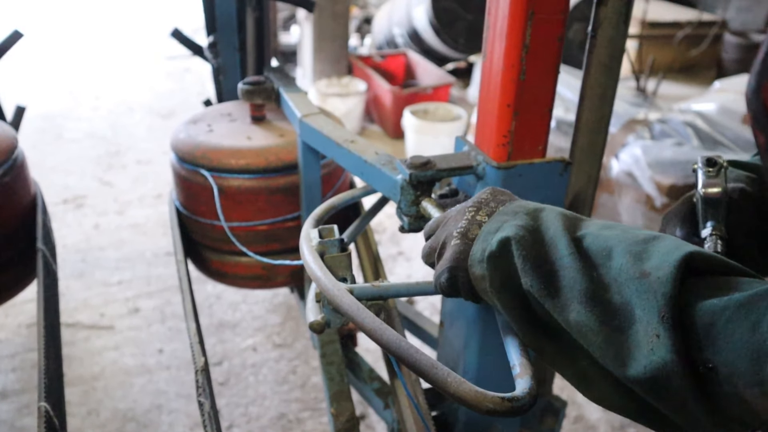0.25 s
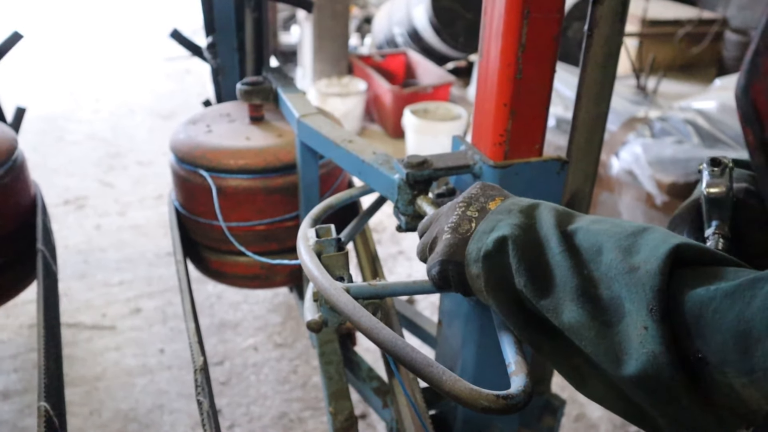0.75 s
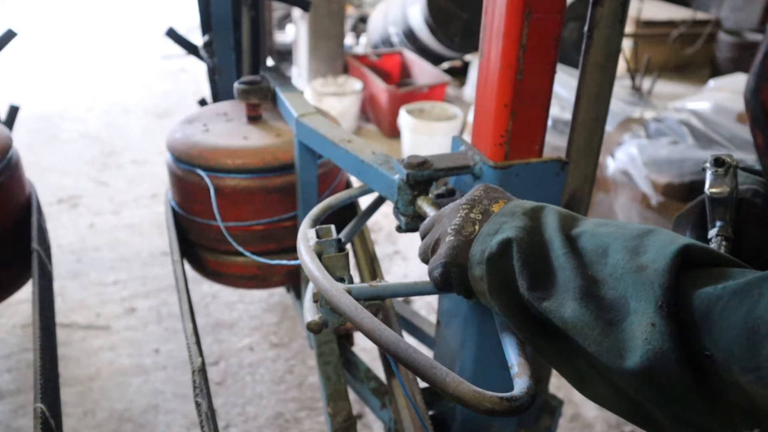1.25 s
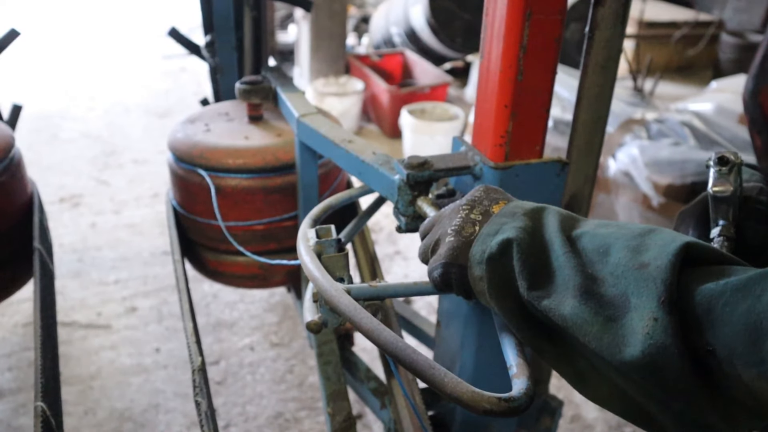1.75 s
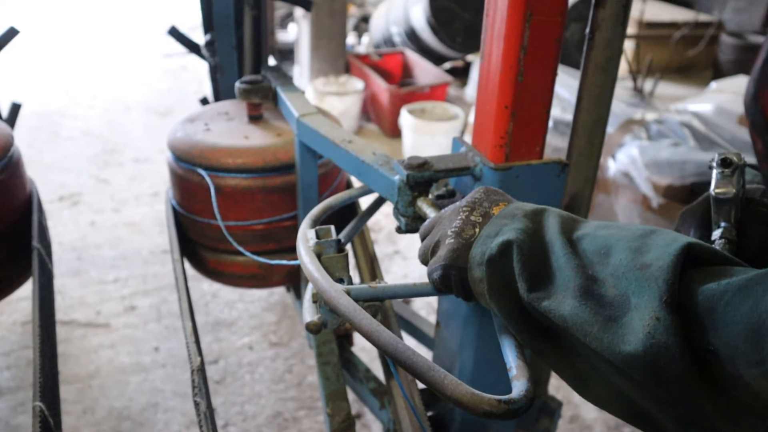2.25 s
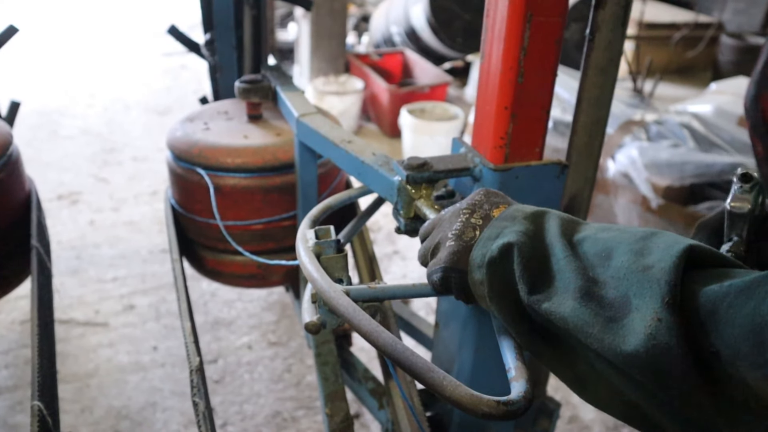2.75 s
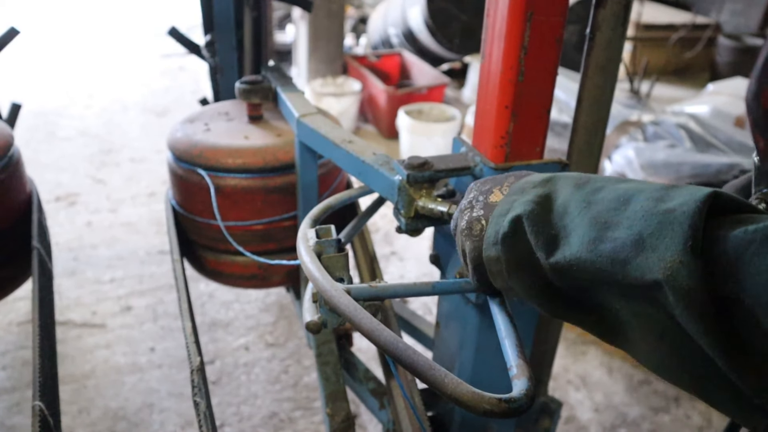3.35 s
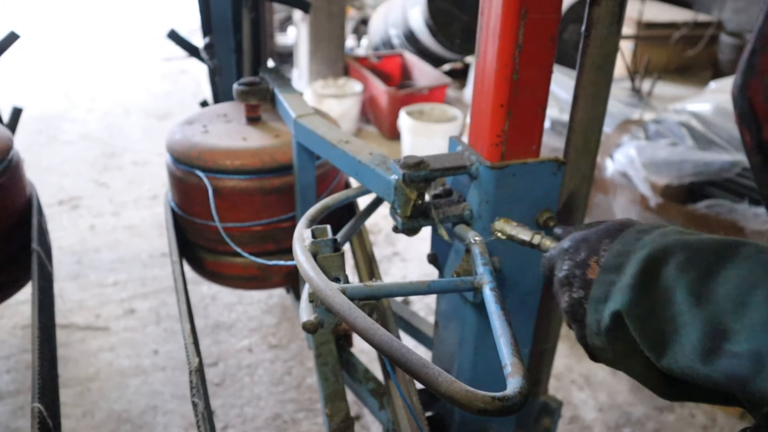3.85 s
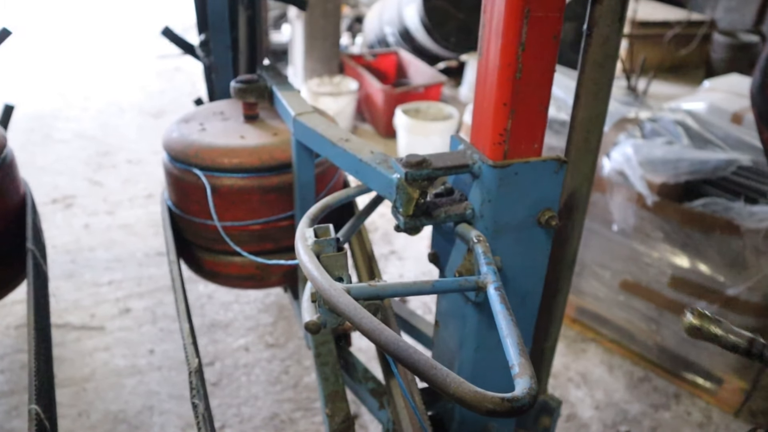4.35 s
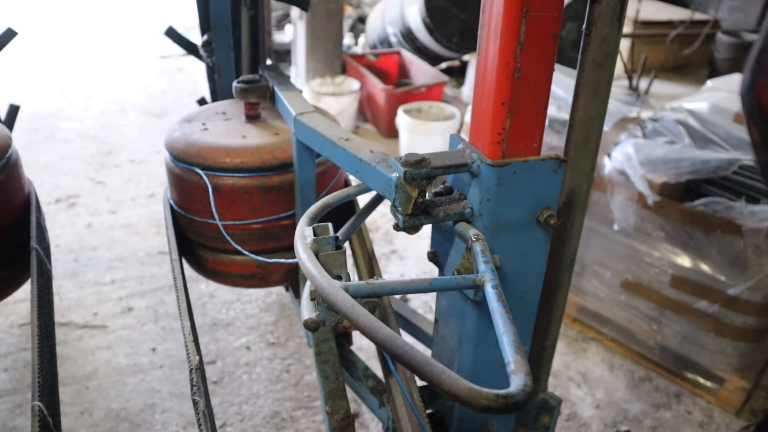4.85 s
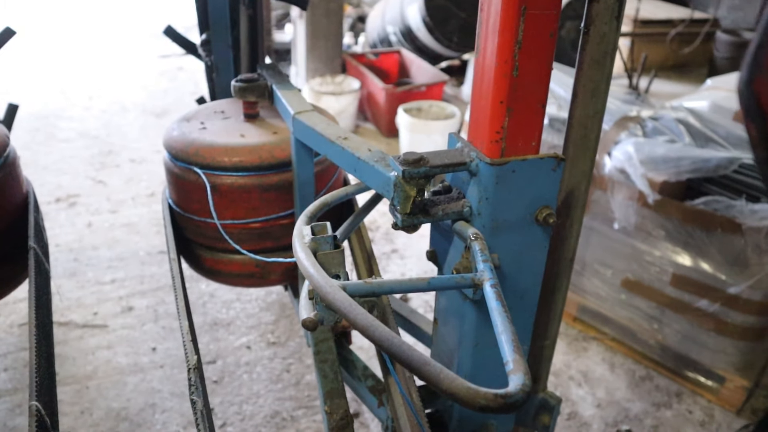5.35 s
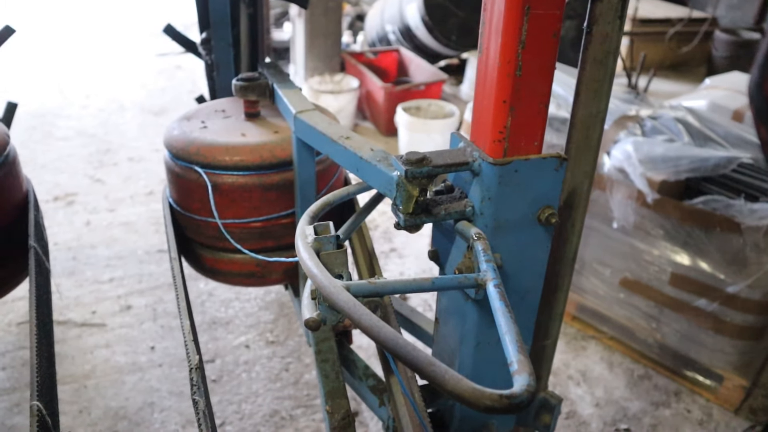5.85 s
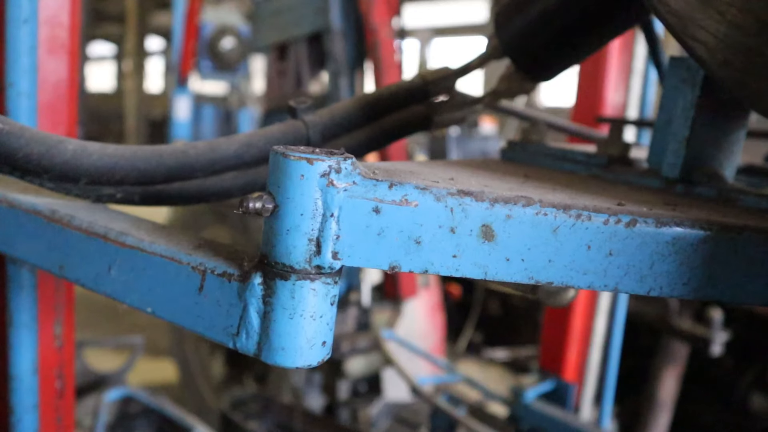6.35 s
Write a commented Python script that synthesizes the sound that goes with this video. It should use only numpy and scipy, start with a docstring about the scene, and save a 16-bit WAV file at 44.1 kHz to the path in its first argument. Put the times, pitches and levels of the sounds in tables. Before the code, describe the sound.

Close up in a quiet shed, a gloved hand and stiff sleeve crackle with tiny dry ticks and soft gun bumps. A brief steel lever scrape leads to two very loud pops close together, then a third with a metallic clack, and a fourth after a pause. Each cracks with hissing air that dies in the shed. The close microphone overloads; the right channel is covered, dull and bassy.

```python
"""Grease gun in a quiet shed

Two microphones in a shed, the right one covered: a grease gun pops four times, each pop a ringing barrel
with a crack and a rush of shaped noise that dies with the shed. Glove and sleeve crackle as short grains,
the lever scrapes as grains over noise, and small knocks are bursts of noise through resonances.
Behind them lies a distant outdoor wash of patchy noise with a soft band and a low rumble."""
import sys
import numpy as np
from scipy import signal
from scipy.fft import rfft, irfft
from scipy.io import wavfile
from scipy.ndimage import uniform_filter1d

SR = 44100
rng = np.random.default_rng(int(sys.argv[2]) if len(sys.argv) > 2 else 0)


def unload_audio(sound):
    """Save the sound as a 16-bit wav file, at the path given as the first command line argument."""
    columns = np.transpose(np.atleast_2d(sound))
    # keep every value between -1 and 1, then stretch to whole-number steps
    steps = np.round(np.clip(columns, -1, 1) * 32767)
    wavfile.write(sys.argv[1], SR, steps.astype(np.int16))


N = 290619
TIME = np.arange(N) / SR
BINS = np.fft.rfftfreq(N, 1 / SR)

# valve slams: (time [s], peak level before the bass cut [dB], barrel tuning factor, tilt [dB per octave],
# crack level [dB], crack frequency [Hz])
POPS = [(2.701, 4, 1.02, 7, -9.5, 6000), (2.9389, 3, 1.08, 6, -10.5, 5660),
        (3.685, 3.5, 1.02, 4, -12, 6540), (4.6314, 4, 1.1, 8.5, -8, 5200)]
# modes of the barrel: (frequency before tuning [Hz], level before tilt [dB], t60 [s])
BARREL_MODES = [(353, 15.5, 0.05), (545, 20.5, 0.015), (667, 6.5, 0.043), (1020, 4.5, 0.012),
                (1335, -2.5, 0.028), (1935, -9, 0.029), (2690, -12.5, 0.079)]
PUSH_DB, PUSH_S = -30, 0.00081  # low push of air, relative to its pop; time to its peak


def pops():
    """The valve slams: a suction pulse rings the barrel, then a bright crack of air follows."""
    out, t = np.zeros(N), np.arange(6000) / SR
    for s, db, tuning, tilt_db, crack_db, crack_hz in POPS:
        thump = np.zeros(len(t))
        for hz, mode_db, t60 in BARREL_MODES:
            fade = amp(mode_db + tilt_db * np.log2(hz / 500) - 60 * t / t60)
            thump -= fade * np.sin(2 * np.pi * hz * tuning * t)
        add(out, s, amp(db) * thump / abs(thump).max())

        noise = rng.standard_normal(len(t))
        crack = evened(resonate(noise, crack_hz, 1150.0) + 0.051 * noise)
        add(out, s, amp(crack_db - 60 * t / 0.099) * crack * (1 - np.exp(-(t / 0.0025) ** 2)))

        lead = np.arange(-100, 0) / SR  # the valve chatters just before it slams
        chatter = amp(-16.0 + 20000.0 * lead) * np.cos(2 * np.pi * 1400.0 * lead)
        add(out, s + lead[0], chatter)
    out = high_pass(out, 4, 245.0)  # a small barrel radiates no deep bass
    for s, db, *_ in POPS:
        add(out, s, amp(db + PUSH_DB) * t / PUSH_S * np.exp(1 - t / PUSH_S))
    return out


# the air that comes with each pop: (level before recovery and colour [dB], flow time [s],
# recovery of the limiter [dB], brightness [0-1])
RUSHES = [(-18, 0.17, 1, 0.89), (-20, 0.0071, 9, 0.02), (-18, 0.027, 13, 0.94), (-17.5, 0.0048, 14, 0.27)]
# spectrum of the jet: (frequency [Hz], relative level [dB per Hz])
JET_SPECTRUM = [(35, -57), (60, -20.5), (98, -7), (354, 3), (1060, -8), (1250, -1), (1950, -5), (2300, -7),
                (3190, -5), (4450, -5.5), (6350, -5), (7750, -3), (10800, -13.5), (12400, -12),
                (16000, -28)]
# steel parts that the air excites: (frequency [Hz], width [Hz], level in a dull rush [dB],
# level in a bright rush [dB])
RUSH_RINGS = [(2460, 110, 6, -14), (2700, 124, -8, -1.5), (3240, 150, -6, 1.5), (3800, 120, 4, -1),
              (4070, 110, -8, 3), (5020, 150, 3, -1), (5330, 150, 7, -10), (5890, 140, 10, 5),
              (6750, 150, -21, -6), (7720, 84, -4, -4), (7970, 290, -9, -2)]
# colour at both ends of brightness: (frequency [Hz], dull level [dB], bright level [dB])
RUSH_COLOUR = [(100, 4, -7.5), (230, -7.5, -6), (540, 6, -3.5), (1580, -4.5, -2), (2850, -1.6, 2),
               (5500, -1.5, -3), (10900, -3, 2)]
RUSH_LEAD_S, RUSH_RISE_S = 0.0015, 0.003  # the air starts just before the pop
RECOVERY_S = 0.28  # the recorder's limiter recovers after each pop, lifting the dying air
RUSH_PATCHES_DB = 2.0  # the jet is uneven in short patches
FLUTTER_DB = 0.34  # the whole jet flutters as it spits grease


def rush():
    """Turbulent air rings the steel; once the flow stops each band dies with the shed, under a set lift."""
    noise = patchy(rng.standard_normal(N), RUSH_PATCHES_DB)
    jet = evened(coloured(noise, JET_SPECTRUM))
    flutter = uniform_filter1d(uniform_filter1d(rng.standard_normal(N), size=500), size=500)
    jet = jet * amp(FLUTTER_DB * evened(flutter))

    out, t = np.zeros(N), np.arange(SR) / SR
    colour_hz, dull_db, bright_db = np.transpose(RUSH_COLOUR)
    for (pop_s, *_), (db, flow, recovery_db, bright) in zip(POPS, RUSHES):
        s = pop_s - RUSH_LEAD_S
        hz, frame, z = signal.stft(jet[round(s * SR):][:SR], SR, nperseg=512, noverlap=384)
        rings = np.zeros(len(hz))
        for ring_hz, width, dull, clear in RUSH_RINGS:
            gain = amp(dull + bright * (clear - dull))
            rings += gain / (1 + (2 * (hz - ring_hz) / width) ** 2)
        z = z * (1 + rings)[:, None]

        since = np.maximum(frame - flow, 0)
        # the fade starts at the shed's own rate and steepens as it goes
        dying_db = -60 * since * (1 + 0.5 * since) / read(SHED_DECAY, hz)[:, None]
        colour = np.transpose([colour_hz, dull_db + bright * (bright_db - dull_db)])
        z = z * amp(dying_db + read(colour, hz)[:, None])
        sound = signal.istft(z, SR, nperseg=512, noverlap=384)[1][:SR]

        recovering_db = recovery_db * np.sin(np.pi / 2 * np.minimum(t / RECOVERY_S, 1))
        add(out, s, amp(db + recovering_db) * sound * np.minimum(t / RUSH_RISE_S, 1))
    return out


# spectrum of steel on steel: (frequency [Hz], relative level [dB per Hz])
SCRAPE_SPECTRUM = [(40, -39), (120, -7), (300, 2.5), (700, -2.5), (1500, -6.5), (3000, -15), (6000, -20),
                   (10000, -21), (16000, -33)]
# lever strokes: (time [s], held [s], rasp level [dB], hiss level [dB])
STROKES = [(2.432, 0.078, -29.5, -33), (2.623, 0.034, -33.5, -56)]
STROKE_RISE_S, RASP_FADE_DB_PER_S, HISS_FADE_DB_PER_S = 0.015, 200.0, 165


def lever(split_hz=3400.0):
    """Uneven slips of steel on steel: grains over scraping noise, the hiss fading before the rasp."""
    sizes = amp(0.82 * np.minimum(rng.exponential(1, N), 4))
    grains = sizes * (rng.random(N) < 1500.0 / SR) * rng.standard_normal(N)
    z = rfft(evened(grains) + 1.1 * rng.standard_normal(N)) * amp(read(SCRAPE_SPECTRUM, BINS))
    low = 1 / (1 + (BINS / split_hz) ** 4)
    rasp, hiss = evened(irfft(z * low, N)), evened(irfft(z * (1 - low), N))

    out = np.zeros(N)
    for s, held, rasp_db, hiss_db in STROKES:
        out += amp(rasp_db) * envelope(s, STROKE_RISE_S, held, 2.5, RASP_FADE_DB_PER_S) * rasp
        out += amp(hiss_db) * envelope(s, STROKE_RISE_S, STROKE_RISE_S, 0, HISS_FADE_DB_PER_S) * hiss
    return out


# the loudest single crackles of glove and sleeve: (time [s], relative level [dB], frequency [Hz])
TICKS = [(0.1925, -38, 8630), (0.232, -33, 7660), (0.2937, -39, 8500), (0.4355, -22, 8700),
         (0.4758, -34, 7450), (0.4906, -23, 7000), (0.5686, -35, 7360), (0.6981, -29.5, 7300),
         (0.7503, -26, 8200), (0.7701, -38, 8000), (0.7876, -33, 7850), (1.0784, -35, 7420),
         (1.2276, -39, 7940), (1.4895, -37, 6600), (1.6616, -45, 7170), (1.706, -39, 6760),
         (1.8188, -43, 7150), (2.4484, -22, 6230), (2.4763, -22, 9800), (3.265, -35, 6950),
         (3.2896, -45, 5000), (3.4198, -43, 7250), (3.4336, -41, 3820), (4.9056, -31, 5600),
         (5.2245, -40, 6360), (5.2669, -43, 5960), (5.9384, -40, 6650), (6.0861, -43, 5280),
         (6.1554, -36.5, 4900)]


def ticks():
    """Each crackle is a few cycles with a weaker twin just behind."""
    out, t = np.zeros(N), np.arange(200) / SR
    for (s, db, hz), (lag, twin) in zip(TICKS, rng.random((len(TICKS), 2))):
        cycles = t * hz / 1.17
        tick = amp(db + 11.0) * np.sin(2 * np.pi * hz * t) * cycles ** 2 * np.exp(-cycles)
        add(out, s, tick)
        add(out, s + 0.0005 + 0.00087 * lag, 0.5 * twin * tick)
    return out


# moves of the sleeve, spells of dense fine crackle:
# (time [s], held [s], level before sag and coating [dB], frequency [Hz])
MOVES = [(0.001, 0.058, -52, 8100), (0.17, 0.16, -47, 8200), (0.406, 0.11, -39.5, 7150),
         (0.66, 0.17, -44.5, 7260), (1.01, 0.093, -47.5, 8500), (1.213, 0.057, -47.5, 8600),
         (1.487, 0.035, -45, 6000), (1.608, 0.071, -46.5, 5900), (1.81, 0.037, -48.5, 5640),
         (5.874, 0.5, -55.5, 5670)]
# thin rings of the stiff fabric: (frequency [Hz], width [Hz], level relative to the crackle [dB])
COATING = [(4630, 360, -16.5), (7200, 230, -14.5)]
MOVE_RISE_S, MOVE_SAG_DB, MOVE_FADE_DB_PER_S = 0.008, 4, 142
FIDGET_DB, FIDGET_HZ, FIDGET_ENDS_S = -60, 8300, 2.4  # faint crackle under and between the moves
GRAIN_SPREAD_DB, GRAINS_PER_S, PITCH_SCATTER = 3.6, 900.0, 0.14  # crackle of the fabric


def rustle():
    """Many small crackles, their pitch drifting with the fabric, over thin rings of stiff coating."""
    powers = []
    for s, held, db, hz in MOVES:
        move = amp(db) * envelope(s, MOVE_RISE_S, held, MOVE_SAG_DB, MOVE_FADE_DB_PER_S)
        powers.append(move ** 2)
    powers.append(amp(FIDGET_DB) ** 2 * (TIME < FIDGET_ENDS_S) + 1e-12)
    powers = np.array(powers)
    power = powers.sum(axis=0)
    # the strongest move at each moment weighs most in the pitch
    centre = np.append(np.transpose(MOVES)[-1], FIDGET_HZ) @ powers / power

    sizes = amp(GRAIN_SPREAD_DB * np.minimum(rng.exponential(1, N), 4))
    grains = sizes * (rng.random(N) < GRAINS_PER_S / SR)
    grains = evened(grains * rng.choice([-1.0, 1.0], N)) + 0.23 * rng.standard_normal(N)
    drift = evened(uniform_filter1d(rng.standard_normal(N), size=300))
    pitch = centre * (1 + PITCH_SCATTER * drift)
    fabric = evened(resonate(resonate(grains, pitch, 2200.0), pitch, 4400.0))
    for hz, width, db in COATING:
        fabric = fabric + amp(db) * evened(resonate(resonate(grains, hz, width), hz, 2 * width))
    return np.sqrt(power) * fabric


# clacks, hums and rubs, one row per resonance:
# (time [s], envelope peak [dB], frequency [Hz], width [Hz], rise [s], t60 [s])
KNOCKS = [(.49, -42.5, 2950, 800, 0.1, 0.36), (2.445, -38, 1470, 500, .006, 0.22),
          (2.492, -31, 675, 55, 0.024, 0.14), (2.495, -30.5, 364, 55, 0.02, 0.11),
          (3.7697, -11, 4100, 1500, .0006, 0.035), (3.7697, -12, 5600, 2500, .0005, 0.02),
          (3.7695, -17, 1400, 700, .002, 0.07), (5.225, -39, 103, 35, 0.027, 0.058),
          (5.936, -45, 1880, 2520, 0.0078, 0.21)]
# what the gun rings with when bumped: (frequency [Hz], width [Hz], relative level [dB])
GUN_BODY = [(371.5, 143, 0), (657, 100, 5), (1096, 190, 3), (1530, 180, -3), (1980, 300, -5)]
# bumps of the gun: (time [s], peak of the lowest resonance [dB], tilt [dB per octave], t60 [s])
BUMPS = [(.183, -37.5, -2, 0.23), (.44, -47, -7.5, 0.14), (2.615, -24.5, -16, 0.042),
         (2.875, -22.5, -25, 0.025), (3.369, -41, -21, 0.19)]
BUMP_RISE_CYCLES = 1.8


def knocks():
    """Dull blows and rubs: a burst of noise through one resonance; the narrow ones ring as tones."""
    bumps = []
    for s, db, tilt_db, t60 in BUMPS:
        for hz, width, body_db in GUN_BODY:
            level_db = db + body_db + tilt_db * np.log2(hz / GUN_BODY[0][0])
            bumps.append((s, level_db, hz, width, BUMP_RISE_CYCLES / hz, t60))

    out, t = np.zeros(N), np.arange(SR // 2) / SR
    for s, db, hz, width, rise, t60 in list(KNOCKS) + bumps:
        ring = resonate(resonate(rng.standard_normal(SR), hz, width), hz, 2 * width)[SR - len(t):]
        clear = np.exp(-width / 88.0)  # share of pure tone
        ring = (1 - clear) * evened(ring) + clear * np.sqrt(2) * np.sin(2 * np.pi * hz * t)
        fade = amp(-60 * t / t60) * (1 - np.exp(-t / rise))
        ring_rms = np.sqrt(np.sum((fade * ring) ** 2) / np.sum(fade ** 2))
        add(out, s, amp(db) * fade / fade.max() * ring / ring_rms)
    return out


# decay of the shed: (frequency [Hz], t60 [s])
SHED_DECAY = [(100, 0.66), (250, 0.77), (600, 0.78), (1500, 0.65), (3300, 0.71), (6000, 0.58), (9000, 0.54),
              (14000, 0.43)]


def shed(x):
    """Sparse echoes of random sign, each band dying at its own speed."""
    taps = np.zeros(SR)
    at = np.arange(400, SR - 20, 20)
    taps[at + rng.integers(0, 20, len(at))] = rng.choice([-1.0, 1.0], len(at))
    hz, t, z = signal.stft(taps, SR, nperseg=256)
    tail = signal.istft(z * amp(-60 * t / read(SHED_DECAY, hz)[:, None]), SR, nperseg=256)[1]
    tail = high_pass(tail, 2, 260.0)  # bass escapes through the thin walls
    return signal.fftconvolve(x, tail / np.linalg.norm(tail))[:N]


# spectrum of the shed at rest: (frequency [Hz], relative level [dB per Hz])
AIR_SPECTRUM = [(18, -33), (30, -40.5), (48, -64), (153, 3), (760, 1), (1280, -3), (2290, -4),
                (3980, -12.5), (6720, -14), (14000, -24.5), (16000, -17.5)]
# the shed's wash: (time [s], level [dB], soft band relative to it [dB], rumble relative to it [dB])
AIR_LEVEL = [(0, -48.5, -18, -14.5), (2.4, -48, -8, -17), (4.0, -48.5, -10, -21), (5.3, -46, -10, -20),
             (6.1, -46, -5, -19.5), (6.59, -46.5, -5, -11)]


def air():
    """Distant outdoor wash; a soft band near 2 kHz grows and a low rumble comes and goes."""
    s, *columns = np.transpose(AIR_LEVEL)
    db, band_db, rumble_db = (np.interp(TIME, s, c) for c in columns)
    wash = patchy(evened(coloured(rng.standard_normal(N), AIR_SPECTRUM)), 0.94)
    band = evened(resonate(resonate(rng.standard_normal(N), 2030.0, 910.0), 2030.0, 910.0))
    rumble = evened(resonate(resonate(rng.standard_normal(N), 105.6, 74.0), 105.6, 74.0))
    return amp(db) * (wash + amp(band_db) * band + amp(rumble_db) * rumble)


def amp(db):
    """dB to gain."""
    return 10 ** (np.asarray(db) / 20)


def evened(x):
    """Scales to rms 1."""
    return x / np.sqrt(np.mean(x ** 2) + 1e-20)


def read(points, hz):
    """Reads a spectrum on a log-frequency axis."""
    f, value = np.transpose(points)
    return np.interp(np.log(hz + 1), np.log(f + 1), value)


def coloured(x, spectrum):
    """Shapes a full-length sound by a spectrum in dB."""
    return irfft(rfft(x) * amp(read(spectrum, BINS)), N)


def high_pass(x, order, hz):
    """Cuts the bass below hz."""
    return signal.sosfilt(signal.butter(order, hz, "high", fs=SR, output="sos"), x)


def add(mix, s, sound):
    """Mixes a sound in at time s."""
    part = mix[round(s * SR):][:len(sound)]
    part += sound[:len(part)]


def resonate(x, hz, width):
    """Shifts the curve hz to zero, smooths, shifts back: a resonance of gain 1."""
    turn = np.exp(2j * np.pi * np.cumsum(hz * np.ones(len(x))) / SR)
    r = np.exp(-np.pi * width / SR)
    return 2 * (turn * signal.lfilter([1 - r], [1, -r], x / turn)).real


def patchy(x, depth_db):
    """Random patches of level over time and frequency."""
    z = signal.stft(x, nperseg=256)[2]
    patches = uniform_filter1d(rng.standard_normal(z.shape), size=5, axis=0)
    patches = uniform_filter1d(patches, size=9, axis=1)
    return signal.istft(z * amp(depth_db * evened(patches)), nperseg=256)[1][:N]


def envelope(s, rise, held, sag_db, fade_db_per_s):
    """Rises from s, sags while held, then fades."""
    t = TIME - s
    level_db = -sag_db * np.clip(t / held, 0, 1) - fade_db_per_s * np.maximum(t - held, 0)
    return np.clip(t / rise, 0, 1) * amp(level_db)


def scene():
    """All sources reach both microphones alike."""
    small = knocks() + ticks() + rustle()
    mono = pops() + rush() + lever() + small + amp(-8.5) * shed(small) + air()
    return np.array([mono, mono])


# the level dips for a moment: (start [s], end [s])
DROPOUT = (6.285, 6.3015)
OFFSET = 0.0004  # constant offset of the converter
FULL, EDGE_HZ = 1.0, 15750  # overload level, upper band edge


def record(dry):
    """Microphones lose deep bass, add hiss and overload; the covered right one is dull and lags."""
    left, right = high_pass(dry, 1, 40.0)
    right = signal.lfilter(*signal.butter(1, 22.0, "high", fs=SR), right)
    # the cover passes little above 119 Hz; its delay is split between one and two samples
    pole, one_sample = np.exp(-2 * np.pi * 119.0 / SR), 0.8
    cover = [0, (1 - pole) * one_sample, (1 - pole) * (1 - one_sample)]
    right = amp(4.0) * signal.lfilter(cover, [1, -pole], right)

    t = np.arange(4000) / SR  # a faint scattered treble smear, as lossy coding leaves, on the right
    smear = rng.standard_normal(len(t)) * amp(-60 * t / 0.09)
    right = right + amp(-31.0) * signal.oaconvolve(dry[1], smear / np.linalg.norm(smear))[:N]

    hiss = amp([[-60.0], [-59.0]]) * rng.standard_normal((2, N))
    both = np.array([left, right]) + hiss
    start, end = DROPOUT
    gap_s = [start - 0.001, start, start + 0.008, end - 0.001, end]
    gap_db = np.interp(TIME, gap_s, [0, -17.0, -33.0, -32.0, 0])
    both = np.clip(both * amp(gap_db) + OFFSET, -FULL, FULL)
    band_limit = signal.firwin(511, EDGE_HZ, window=("kaiser", 9), fs=SR)
    return np.clip(signal.oaconvolve(both, band_limit[None], "same"), -FULL, FULL)


dry = scene()
out = record(dry)
unload_audio(out)
```